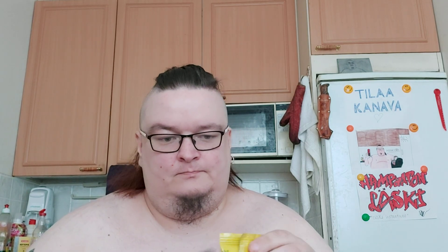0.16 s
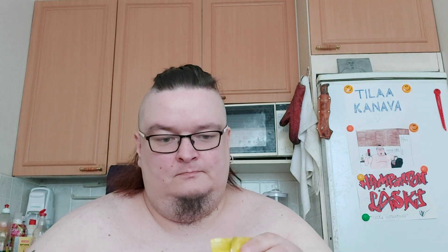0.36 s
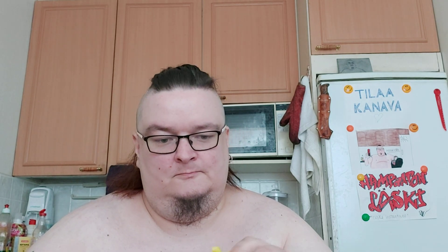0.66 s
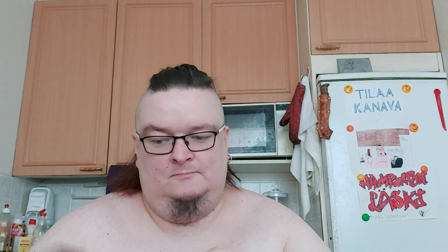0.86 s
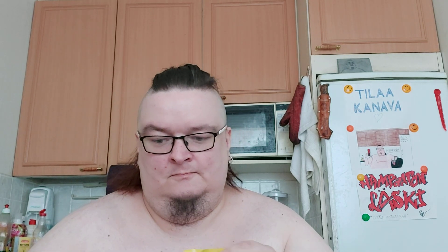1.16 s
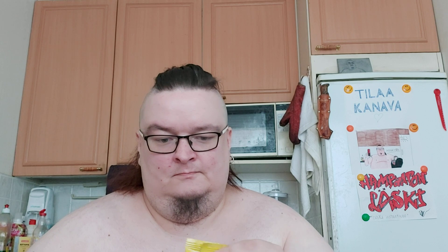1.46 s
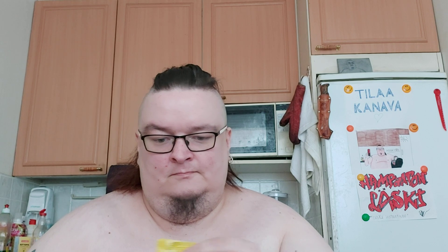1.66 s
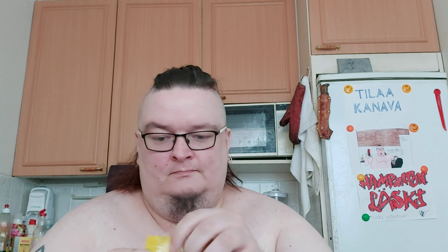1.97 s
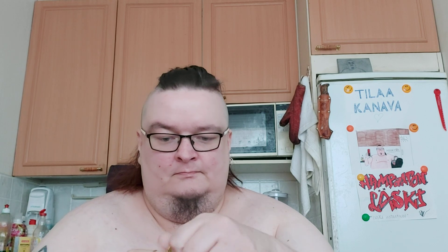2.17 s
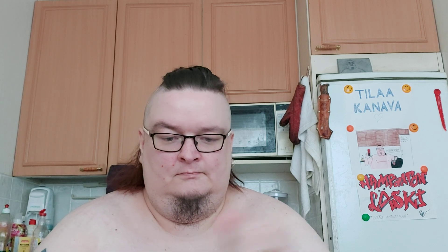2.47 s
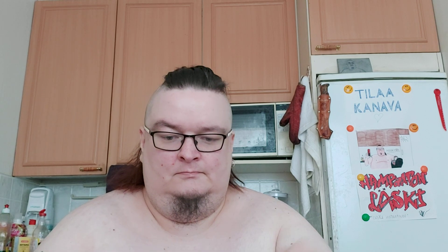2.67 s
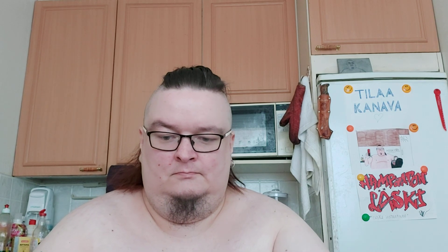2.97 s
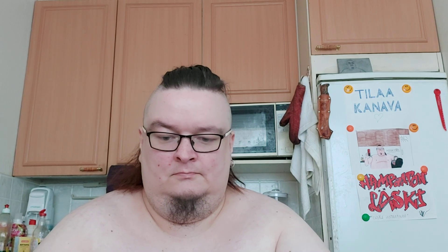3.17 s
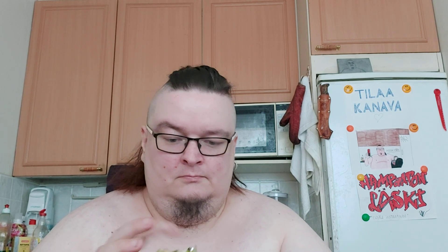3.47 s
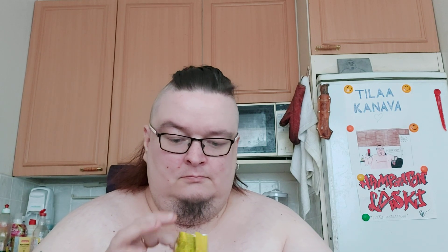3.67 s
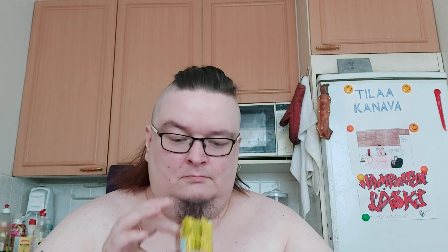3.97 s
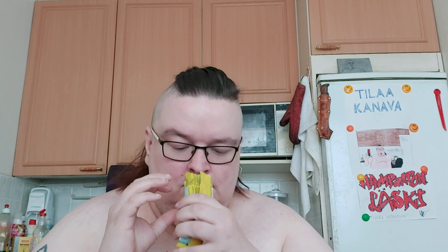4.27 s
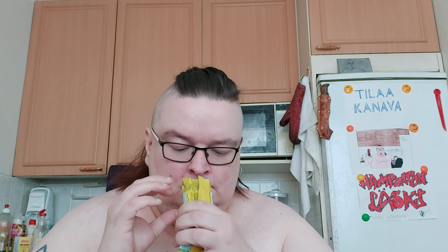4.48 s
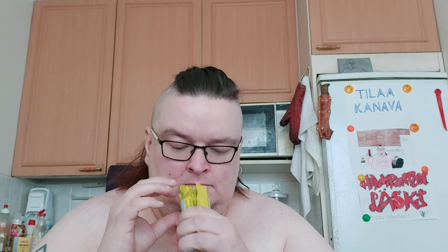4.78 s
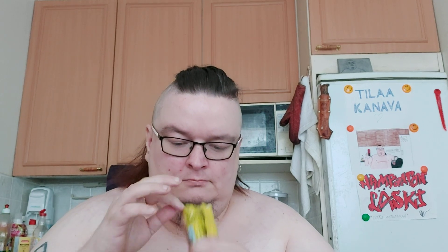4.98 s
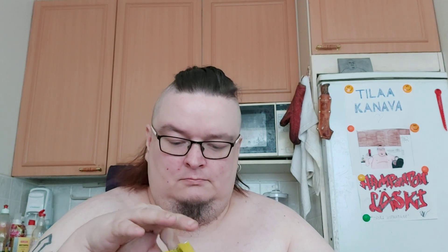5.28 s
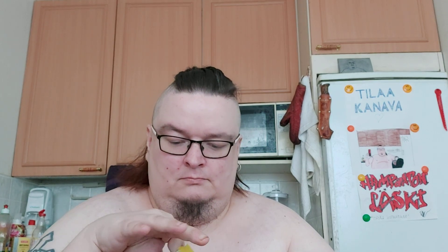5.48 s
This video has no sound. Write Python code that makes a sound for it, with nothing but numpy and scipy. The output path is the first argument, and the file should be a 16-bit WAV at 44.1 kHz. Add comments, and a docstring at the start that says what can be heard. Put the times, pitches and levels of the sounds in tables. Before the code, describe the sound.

A plastic wrapper is handled and pulled open close to the microphone, giving irregular crinkles and sharp little snaps. After the first flurry, something is set down on the table with a dull knock. The crackling resumes, peaks in a few loud snaps, then thins to scattered ticks and a soft rumble of hands on the table before one last crackle. A fridge hums faintly in the small, quiet kitchen.

```python
"""A biscuit wrapper in a kitchen

A plastic wrapper is handled and pulled open over a table. Its creases buckle under stress: large ones
in single snaps, tiny folds in showers of crinkles. Shifting hands rub a rumble out of the table, and
something set down excites its modes in a dull knock, between two fainter bumps. Cupboards and tiles
reflect the sound briefly, and a fridge hums behind."""
import sys
import numpy as np
from scipy import signal
from scipy.fft import rfft, irfft, next_fast_len
from scipy.io import wavfile
from scipy.ndimage import map_coordinates

SR = 44100
rng = np.random.default_rng(int(sys.argv[2]) if len(sys.argv) > 2 else 0)


def write(x):
    x = np.atleast_2d(x).T
    wavfile.write(sys.argv[1], SR, np.round(np.clip(x, -1, 1) * 32767).astype(np.int16))


N = 247968

# noise spectrum of the kitchen: f/Hz, relative level/dB
AIR_SPECTRUM = [(32, -39), (47, -19), (62, -7.5), (100, -16), (180, -8), (360, -7), (480, -12.5),
                (800, -12), (1500, -14), (2400, -19.5), (4000, -34), (8000, -38.5), (16000, -46.5)]
# slow swell of that noise: t/s, level/dB
AIR_SWELL = [(0, -57), (.4, -52.5), (1.5, -53), (2.7, -52), (3.15, -53.5), (3.9, -54.5), (5.62, -50)]
# partials of the fridge: f/Hz, rms level/dB, level waver/dB, phase drift/rad
FRIDGE_PARTIALS = [(48.6, -63, 1.5, .25), (242, -70, 3, .9), (361, -66.5, 3.5, .9)]
# diffuse field: f/Hz, left-right coherence
DIFFUSE_COHERENCE = [(60, 0.7), (130, 0.98), (290, 0.6), (640, 0.31), (1400, 0), (3100, 0.21), (7000, 0)]
# direct field of the wrapper: f/Hz, left-right coherence
DIRECT_COHERENCE = [(300, 1), (1000, 0.81), (2000, 0.99), (4000, 0.29), (10000, 0.15)]
# snaps of the large creases: t/s, relative level/dB, brightness/(dB/octave),
# low-mid level below 900 Hz/dB, left minus right/dB
CREASES = [(.0436, -43.5, 6.5, 0, 7), (.0724, -31, 3, 2.5, 15), (.2065, -46, 5.5, -5, 2),
           (.2528, -47.5, 3, 6, 4), (.298, -40, 3, 0, 3), (.303, -33, 3, -2, 3), (.433, -28, 3, 11, 3),
           (.4883, -31, 0.5, 0, 6), (.5211, -29, 1, 3, 8), (.6332, -21, -2, -3, -2.5),
           (.679, -30.5, -3, -4, 7), (.7316, -31, -3.5, -3, 4), (.7546, -26, -1, -19, 2),
           (.7843, -20, 2.5, -8, 5), (.7891, -19.5, -2, -10, 5), (.798, -23.5, 3, -13, -9),
           (.8094, -18, 0, -20, 4), (.8469, -24.5, -2.5, -18, -6), (.8638, -23, 2, -12, 2),
           (.9175, -30, -3.5, -7, -3), (.9605, -33, -6, 2, -1), (1.0111, -31, 0.5, 7, -9),
           (1.0348, -32, -2, 7, 2), (1.1121, -36, -4.5, -26, -1), (1.3008, -37, -1.5, -3, 0),
           (1.3317, -29, -10.5, 7.5, -6), (1.3662, -24, -1.5, -7, 4), (1.6628, -35, -3.5, 9, 0),
           (1.6971, -34.5, 1, 20, -6), (1.8168, -35.5, 0, 1, -2), (1.8384, -36.5, -1, -6, -5),
           (1.9184, -22.5, 1, -8, 1), (1.931, -23, 0, 9, -1), (2.0003, -27, 1.5, 15, 1),
           (2.0697, -30, .5, 15, -2), (2.1525, -29.5, -1, 4, 1), (2.186, -30, 3, -7, -1),
           (2.2331, -31, 2, 3, 0), (2.2499, -23, -1.5, -26, -3), (2.2768, -29, -0.5, -12, -3),
           (2.3383, -30.5, 8, 5, 6), (2.389, -29.5, 1, 11, 0), (2.4215, -24, 3, 7, 0),
           (2.4951, -14.5, -1, 1.5, -3), (2.505, -21, 1, 13, 2), (2.5237, -12.5, 1, -7, -2),
           (2.5529, -13.5, 2.5, 12.5, -3), (2.5618, -23, -2, 3.5, 3), (2.7671, -35.5, -1.5, 5, 2),
           (2.8865, -30.5, 5, -8, 7), (2.9034, -29, 7, -2, -12.5), (2.9874, -38, 4, -1, -1),
           (3.0966, -43, 1.5, -3, 5), (3.1788, -40.5, 3, -5, 4), (3.235, -31.5, 0.5, 3, -3),
           (3.268, -43, -2, 4, 0), (3.3792, -28.5, -1.5, -10, -1), (3.416, -26.5, -1, 3, 2),
           (3.4309, -26, 0.5, 7, -9), (3.4821, -31, -9, -9, -1), (3.495, -27.5, -4.5, -4, -6),
           (3.516, -29.5, 2.5, -3, 0), (3.5736, -34.5, -0.5, 0, -4), (3.6205, -31.5, -1.5, -1, -1),
           (3.6905, -22, 1, 6.5, -1), (3.779, -27.5, 1, 2, -2), (3.8787, -39.5, -1.5, -8, -10),
           (4.0255, -37, -10, 4, -1), (4.0692, -34.5, -5.5, 9.5, 0), (4.0909, -31, -2.5, 9, -4),
           (4.191, -41.5, 1, -2, -6), (4.3375, -54, 0.5, -2, -2), (4.4344, -44.5, -6, 0, 1),
           (4.9307, -40.5, -5.5, -6.5, -4.5), (5.203, -40, 0.5, -12, -4), (5.3357, -39.5, -7, 1, -1),
           (5.4193, -30.5, -6.5, -6, -5), (5.4552, -31.5, -3, 0, 0), (5.4735, -19, 1.5, 2.5, -1)]
# radiation spectrum of the film: f/Hz, relative level/dB
FILM_SPECTRUM = [(60, -48), (170, -15), (400, -3.5), (650, -8), (1040, -5.5), (1220, -6), (1750, 1.5),
                 (2700, -1), (4500, -3), (7000, -4), (9500, -9.5), (12000, -6.5), (16000, -16.5)]
# balance of the wrapper's sound: f/Hz, left minus right/dB
FILM_BALANCE = [(2000, 2.5), (4500, -1.1), (8000, -1.0), (13000, 5.5)]
# early reflections from table, cupboards and fridge: delay/s, level/dB
REFLECTIONS = [(.0021, -13.5), (.0046, -23.5), (.0092, -17.5), (0.0096, -12.5), (0.015, -18.5),
               (0.017, -16.5)]
# reverberation time of the kitchen: f/Hz, T60/s
ROOM_DECAY = [(150, 0.41), (400, 0.25), (1000, 0.25), (2800, 0.25), (7500, 0.25), (15000, 0.23)]
# fingers squeeze or pull: t/s at full force, hold/s, effort/dB, rise/s, brightness/(dB/octave)
FINGER_SQUEEZES = [(.08, 0.0088, -45.5, .015, -0.5), (.498, 0.069, -39.5, 0.068, 0),
                   (.64, 0.013, -41, .01, 0), (.779, 0.045, -28, 0.046, 1), (.925, 0.02, -42, 0.019, -1.5),
                   (1.055, 0.033, -49, 0.048, -.5), (1.346, 0.051, -45, 0.1, -1),
                   (1.888, 0.038, -33, .028, 0), (1.97, 0.044, -41.5, .05, -1),
                   (2.062, .012, -45, .05, -2.5), (2.235, 0.036, -36, .11, 1), (2.32, 0.13, -42.5, .05, 0),
                   (2.497, 0.05, -28, 0.015, 1), (2.631, .2, -51, .05, -2), (2.877, 0.01, -42, 0.049, 3.5),
                   (2.98, 0.0064, -51, 0.059, 1.5), (3.21, 0.013, -49, 0.0553, 1.5),
                   (3.38, 0.033, -37.5, 0.059, -2.5), (3.503, 0.0097, -38, 0.043, -1),
                   (3.6, 0.039, -48, 0.13, -4), (3.695, 0.048, -37, 0.15, 0),
                   (4.075, 0.013, -46.5, 0.055, -1.5), (4.94, .025, -44.5, .02, -1.5),
                   (5.41, 0.083, -43.5, 0.045, -2.5), (5.576, .045, -44, 0.038, -4)]
# scatter of the lesser snaps: level/dB, brightness/(dB/octave), low-mid level/dB, left minus right/dB
CREASE_SCATTER = (3.6, 2.05, 3, 3.5)
# hands and arms shift on the table: t/s at full force, hold/s, level/dB, rise/s
HAND_SHIFTS = [(1.2, 0.2, -51, 0.18), (3.73, 0.49, -46, 0.17), (4.65, 0.26, -56, 0.32),
               (4.99, .03, -51, .11), (5.46, .16, -50.5, 0.38)]
# spectrum of their friction: f/Hz, relative level/dB
RUMBLE_SPECTRUM = [(28, -39), (46, -6), (62, -14.5), (120, -18.5), (175, 2.5), (240, -7), (360, -6),
                   (480, -14.5), (900, -15.5), (3000, -63)]
# blows on the table: t/s, relative level/dB, lowest driven f/Hz, highest driven f/Hz
BLOWS = [(1.333, -23.5, 45, 229), (1.592, 2.5, 40, 790), (2.563, -14, 306, 464)]
# spectrum of a blow's first push: f/Hz, relative level/dB
PUSH_SPECTRUM = [(30, -42.5), (80, -7), (200, -6), (400, 1.5), (700, -4.5), (1200, -6.5), (1600, -1),
                 (3000, -6.5), (5000, -14), (16000, -30)]
# modes of the table top and the room around it: f/Hz, relative level/dB, T60/s
TABLE_MODES = [(49.3, -23.5, 0.46), (82.2, -3, 0.18), (122.3, -3.5, 0.22), (241, -14.5, 0.29),
               (286, -9.5, 0.31), (322.3, 3, 0.17), (392, 7.5, 0.065), (468, -2.5, 0.19), (525, 1.5, 0.18),
               (592, -3.5, 0.27), (652, -9, 0.32), (819, -3, 0.21), (958, -4.5, 0.26), (1082, -9, 0.23),
               (1390, -13, 0.16)]


def amp(db):
    """Amplitude ratio of a level in decibels."""
    return 10 ** (np.asarray(db) / 20)


def unit(x):
    """Normalisation to an rms of 1."""
    return x / np.sqrt(np.mean(x ** 2) + 1e-20)


def along(points, hz):
    """Interpolation of (f/Hz, value) rows on a logarithmic frequency axis."""
    f, v = np.transpose(points)
    return np.interp(np.log(hz + 1), np.log(f), v)


def curve(rows):
    """Linear interpolation of (t/s, value) rows at every sample."""
    return np.interp(np.arange(N) / SR, *np.transpose(rows))


def wobble(rate):
    """Smooth random modulation: a spline through rate knots a second."""
    return map_coordinates(rng.standard_normal(int(N * rate / SR) + 4), [np.arange(N) * rate / SR])


def filtered(x, response):
    """Linear filtering: the spectrum is multiplied by a frequency response."""
    m = next_fast_len(x.shape[-1] + SR // 8)
    return irfft(rfft(x, m) * response(np.fft.rfftfreq(m, 1 / SR)), m)[..., :x.shape[-1]]


def minimum_phase(gain, size=2048):
    """Folding the cepstrum gives the most compact causal impulse with this spectral shape; energy 1."""
    cepstrum = irfft(np.log(np.maximum(gain(np.fft.rfftfreq(size, 1 / SR)), 1e-6)))
    cepstrum[1:size // 2] *= 2
    cepstrum[size // 2 + 1:] = 0
    impulse = irfft(np.exp(rfft(cepstrum)))
    return impulse / np.linalg.norm(impulse)


def add(track, s, sound):
    """Superposition of a sound on a track, from time s."""
    part = track[..., max(round(s * SR), 0):][..., :sound.shape[-1]]
    part += sound[..., :part.shape[-1]]


def stereo_noise(size, coherence):
    """Partly coherent white noise: the ratio of mid to side sets the coherence at each frequency."""
    hz = np.fft.rfftfreq(size, 1 / SR)
    turn = np.arccos(np.clip(along(coherence, hz), -1, 1)) / 2
    white = rfft(rng.standard_normal((2, size)))
    mid, side = irfft(white * np.array([np.cos(turn), np.sin(turn)]), size)
    return np.array([mid + side, mid - side])


def diffuse_noise(spectrum):
    """A diffuse field of coloured noise, coherent mainly at long wavelengths; rms 1."""
    return unit(filtered(stereo_noise(N, DIFFUSE_COHERENCE), lambda hz: amp(along(spectrum, hz))))


def room_air():
    """The kitchen's noise floor is a diffuse field whose level drifts slowly."""
    return amp(curve(AIR_SWELL)) * diffuse_noise(AIR_SPECTRUM)


def fridge_hum():
    """Three low partials waver by random amplitude and phase modulation."""
    t = np.arange(N) / SR
    hum = np.zeros(N)
    for hz, db, waver_db, drift in FRIDGE_PARTIALS:
        peak = amp(db + waver_db * wobble(8.4)) * np.sqrt(2)
        hum += peak * np.sin(2 * np.pi * hz * t + drift * wobble(12))
    return hum


def snaps(creases, flutter_s=0.0019, gain_db=18.5, lead_s=.003, lead_db=-17,
          low_mid_hz=900, room_db=-1.17):
    """Snap-through buckling: each crease creaks, flips in a brief flutter and excites the room."""
    direct, reverb = np.zeros((2, N)), np.zeros((2, N))
    t = np.arange(640) / SR - lead_s
    for s, db, bright_db, low_mid_db, pan_db in creases:
        span_s = flutter_s * amp((db + 30) / 4 - bright_db / 2)  # big, dull creases flutter longer
        age = np.maximum(t, 0) / span_s
        flutter = np.tanh(10 * age) * np.exp(-age ** 2)
        creak = amp(lead_db) * np.exp(-np.abs(t) / lead_s)
        burst = (flutter + creak) * stereo_noise(t.size, DIRECT_COHERENCE)
        tilt = lambda hz: bright_db * np.log2(np.maximum(hz, 1500) / 4000)
        shelf = lambda hz: low_mid_db / (1 + (hz / low_mid_hz) ** 4)
        film = minimum_phase(lambda hz: amp(along(FILM_SPECTRUM, hz) + tilt(hz) + shelf(hz)), size=1024)
        click = signal.fftconvolve(burst, film[None], axes=1)
        click *= amp(db + gain_db) / np.linalg.norm(click, axis=1, keepdims=True)
        add(direct, s - lead_s, click * unit(amp([[pan_db / 2], [-pan_db / 2]])))
        add(reverb, s - lead_s, amp(room_db) * signal.fftconvolve(click, room_tail(), axes=1))
    return with_reflections(direct) + reverb


def with_reflections(x, skew_s=.0003):
    """Specular reflection: hard surfaces add delayed copies, each reaching one side a little earlier."""
    out = x.copy()
    for delay, db in REFLECTIONS:
        skew = skew_s * rng.uniform(-1, 1)
        add(out[0], delay + skew, amp(db) * x[0])
        add(out[1], delay - skew, amp(db) * x[1])
    return out


def room_tail(build_s=0.00038, absorb_db=-2.0, size=16384):
    """Reverberation: a fresh diffuse tail of energy 1, each band decaying at its own rate."""
    hz, t, bands = signal.stft(stereo_noise(size, DIFFUSE_COHERENCE), SR, nperseg=256)
    treble_db = absorb_db * (hz / hz[-1] * 2)[:, None]  # absorption reaches absorb_db at 11 kHz
    decay_db = -60 * t / along(ROOM_DECAY, hz)[:, None]
    tail = signal.istft(bands * amp(treble_db + decay_db), SR, nperseg=256)[1]
    tail *= 1 - np.exp(-(np.arange(tail.shape[1]) / SR / build_s) ** 2)
    return unit(tail) / np.sqrt(tail.shape[1])


def effort(gestures, resting_db, release_db_per_s, rise_db=19, sag_db_per_s=21.5):
    """Force envelope in dB: each gesture grows exponentially, sags while held and is let go."""
    t = np.arange(N) / SR
    level = np.zeros(N) + resting_db
    for s, hold_s, db, rise_s, *_ in gestures:
        rising = rise_db * np.maximum(s - t, 0) / rise_s
        fading = sag_db_per_s * np.maximum(t - s, 0) + release_db_per_s * np.maximum(t - s - hold_s, 0)
        level = np.maximum(level, db - rising - fading)
    return level


def crinkles(effort_db, bright_db, treble_hz=4500, gain_db=-3, folds_per_s=380, spread_db=5,
             life_s=0.00065, tilt_db_per_octave=-1.63, room_db=-3, slack_db=-59):
    """Shot noise: tiny folds give way at random, in a denser and louder shower as the effort grows."""
    density = folds_per_s * amp(1.03 * (effort_db + 40.5))
    sizes = unit(amp(spread_db * np.minimum(rng.exponential(size=N), 2)))
    yielding = 1 / (1 + amp(9.7 * (slack_db - effort_db)))  # a slack wrapper stays silent
    buckles = rng.random(N) < yielding * density / SR
    energy = buckles * (sizes * amp(effort_db + gain_db)) ** 2 * SR / density
    age = np.arange(256) / SR / life_s
    fold = (age * np.exp(-age)) ** 2
    envelope = np.sqrt(np.abs(signal.fftconvolve(energy, fold / fold.sum())[:N]))
    shower = envelope * stereo_noise(N, DIRECT_COHERENCE)
    film = minimum_phase(lambda hz: amp(along(FILM_SPECTRUM, hz) + tilt_db_per_octave * np.log2(hz + 1)))
    direct = signal.fftconvolve(shower, film[None], axes=1)[:, :N]
    treble = filtered(direct, lambda hz: 1 - 1 / (1 + (hz / treble_hz) ** 2))
    direct += (amp(2 * bright_db) - 1) * treble  # a cupping hand dulls the film
    out = with_reflections(direct)
    for part in np.array_split(np.arange(N), 28):  # the wrapper moves, so its echo keeps changing
        add(out, part[0] / SR, amp(room_db) * signal.fftconvolve(direct[:, part], room_tail(), axes=1))
    return out


def lesser_creases(effort_db, bright_db, max_per_s=48, half_rate_db=-51.5, level_db=-34, slots=270):
    """Buckling thresholds: more effort flips more creases, and louder ones; random rows as in CREASES."""
    times = (np.arange(slots) + rng.random(slots)) / slots * (N - 1) / SR
    luck = rng.random(slots)
    traits = np.clip(rng.standard_normal((slots, 4)), -2, 2) * CREASE_SCATTER
    at = (times * SR).astype(int)
    chance = max_per_s * N / SR / slots / (1 + amp(3 * (half_rate_db - effort_db[at])))
    traits[:, 0] += level_db + .58 * (effort_db[at] + 40)
    traits[:, 1] += bright_db[at]
    return np.column_stack([times, traits])[luck < chance].tolist()


def hand_rumble():
    """Friction of shifting hands and arms drives a soft rumble in the table."""
    level_db = effort(HAND_SHIFTS, resting_db=-72, release_db_per_s=150)
    return amp(level_db) * diffuse_noise(RUMBLE_SPECTRUM)


def knocks(push_db=5.5, ring_db=-22, room_db=-1, build_s=0.0077, bend_hz=600, edge_hz=1100):
    """Impact excitation: a soft blow pushes the table top once; table and room ring in damped modes."""
    out, t = np.zeros((2, N)), np.arange(SR // 2) / SR
    dispersion = lambda hz: (bend_hz - 1j * hz) / (bend_hz + 1j * hz)  # low bending waves arrive later
    edge_shadow = lambda hz: 1 / (1 + 1j * hz / edge_hz) ** 2  # the table edge shades the direct treble
    for s, db, low_hz, high_hz in BLOWS:
        drive = lambda hz: 1 / np.sqrt((1 + (hz / high_hz) ** 4) * (1 + (low_hz / (hz + 1)) ** 6))
        pulse = minimum_phase(lambda hz: amp(along(PUSH_SPECTRUM, hz)) * drive(hz))
        push = filtered(amp(db + push_db) * pulse[None], dispersion)
        add(out, s, filtered(push, edge_shadow))
        add(out, s, amp(room_db) * signal.fftconvolve(push, room_tail(build_s=0.0027), axes=1))
        for hz, mode_db, t60 in TABLE_MODES:
            # higher modes reach left and right out of step
            apart = np.arccos(np.clip(along(DIFFUSE_COHERENCE, hz), -1, 1)) * rng.choice([-1, 1])
            phase = 2 * np.pi * rng.random() + apart * np.array([[.5], [-.5]])
            onset = 1 - np.exp(-t / (build_s * np.sqrt(500 / hz)))  # low modes build up slowly
            ring = onset * amp(-60 * t / t60) * np.sin(2 * np.pi * hz * t + phase)
            add(out, s, amp(db + ring_db + mode_db) * drive(hz) * ring)
    return out


def scene():
    """Wrapper, table and room superpose; one effort drives both the crinkles and the lesser snaps."""
    table_and_room = knocks() + hand_rumble() + room_air() + fridge_hum()
    effort_db = effort(FINGER_SQUEEZES, resting_db=-80, release_db_per_s=331.5)
    bright_db = curve([(s, bright) for s, *_, bright in FINGER_SQUEEZES])
    wrapper = crinkles(effort_db, bright_db) + snaps(CREASES + lesser_creases(effort_db, bright_db))
    balance = lambda hz: amp(along(FILM_BALANCE, hz) * np.array([[.5], [-.5]]))
    return filtered(wrapper, balance) + table_and_room


def record(dry):
    """Band limiting: a steep low-pass removes the highest treble."""
    cutoff_hz = 16250
    return filtered(dry, lambda hz: 1 / np.sqrt(1 + (hz / cutoff_hz) ** 200))


dry = scene()
out = record(dry)
write(out)
```